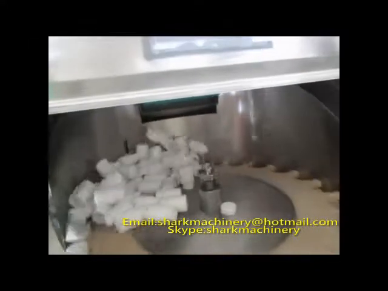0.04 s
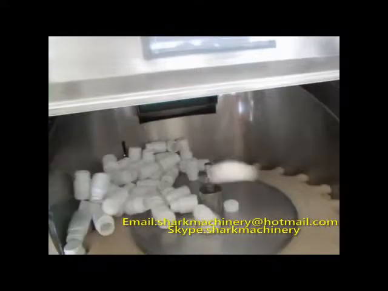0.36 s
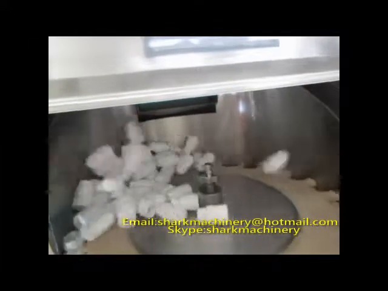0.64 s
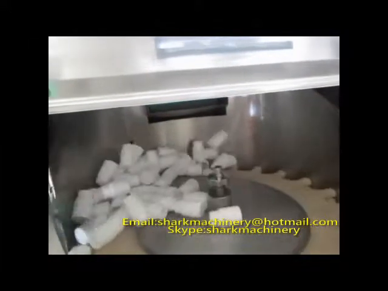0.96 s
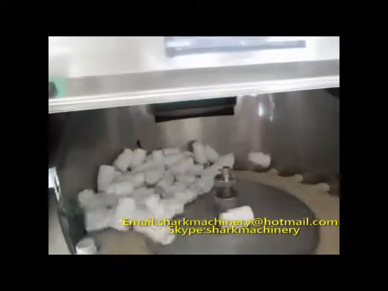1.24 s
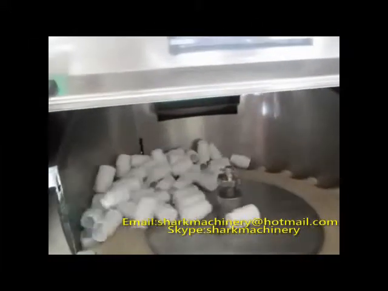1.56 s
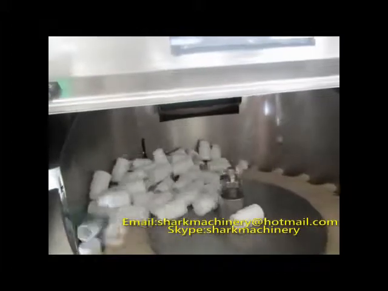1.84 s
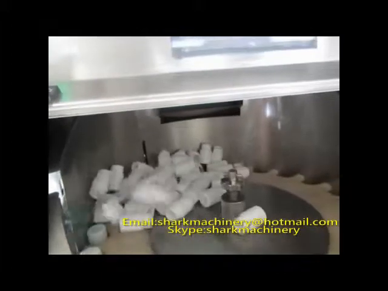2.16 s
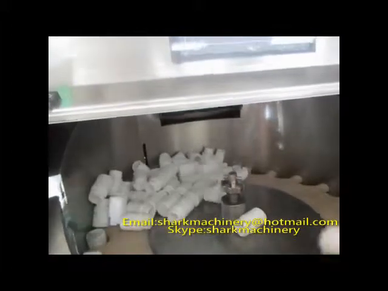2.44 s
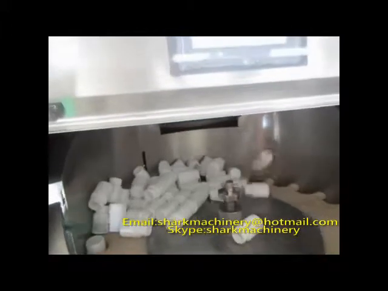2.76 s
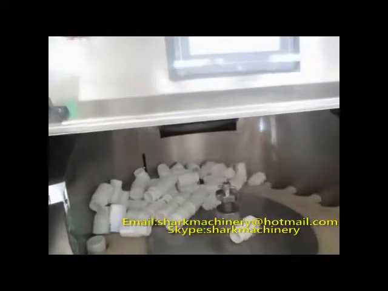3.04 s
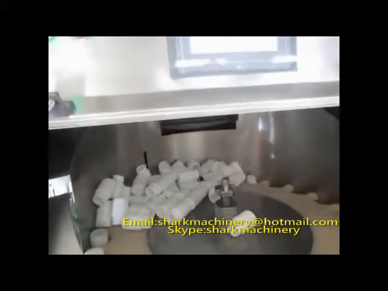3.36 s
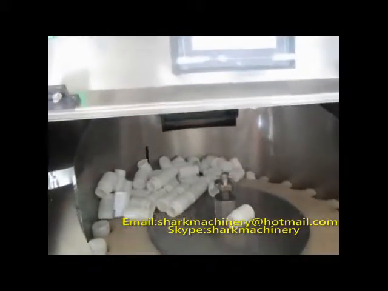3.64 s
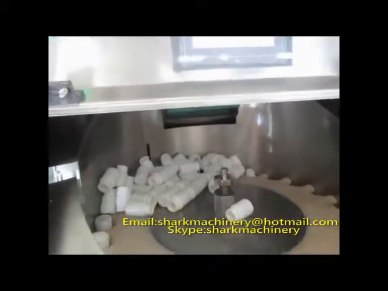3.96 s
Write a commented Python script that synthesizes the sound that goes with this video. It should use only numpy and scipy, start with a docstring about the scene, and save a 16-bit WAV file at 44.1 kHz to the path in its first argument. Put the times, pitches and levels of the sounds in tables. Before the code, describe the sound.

Empty plastic bottles tumble close by in a sorting machine's steel bowl, knocking hollowly and sliding over steady motor noise. Just past halfway a valve thumps and air hisses briefly. The bottles clatter on, then settle.

```python
"""Empty plastic bottles tumble in the turning steel bowl of a sorting machine, over steady motor noise.
From the start they knock hollowly, bump the bowl's disc and slide with a hiss.
At about 2.3 s a valve thumps and an air jet blows into the bowl for a quarter of a second.
The bottles clatter on and settle by 3.5 s. A soft thud and a little more hiss come near the end."""
import sys
import numpy as np
from scipy import signal
from scipy.fft import irfft
from scipy.io import wavfile
from scipy.ndimage import uniform_filter1d

SR = 44100
rng = np.random.default_rng(int(sys.argv[2]) if len(sys.argv) > 2 else 0)


def put_to_file(sound):
    """Save the sound as 16-bit audio at rate SR, in the file named by the first command-line argument."""
    columns = np.atleast_2d(sound).T  # one column per channel
    safe = np.clip(columns, -1, 1)
    whole_steps = np.round(safe * 32767)
    wavfile.write(sys.argv[1], SR, whole_steps.astype(np.int16))


N = 176400
TIME, HZ = np.arange(N) / SR, np.fft.rfftfreq(N, 1 / SR)
HIT_TIME, HIT_HZ = np.arange(6144) / SR, np.fft.rfftfreq(6144, 1 / SR)  # the same axes for one short hit


def bottles():
    """Clear knocks and bright rim pings stand out from the random jostling of the heap."""
    # clear knocks: start_s, level_db, pitch_hz, clack_db, tick_db (the last two relative to the level)
    knocks = [(0.204, -12, 894, -8, -30), (0.239, -11, 947, 0.5, -16.5), (0.261, -11, 886, -1.5, -21),
              (0.321, -11.5, 944, 3.5, -14.5), (0.334, -7, 900, -5.5, -26.5), (0.434, -6.5, 885, -9, -30),
              (0.462, -10.5, 945, -4.5, -18.5), (0.543, -11.5, 830, -6.5, -24),
              (0.578, -11.5, 910, -3, -19), (0.593, -7.5, 830, -3.5, -17.5), (0.606, -17.5, 865, 4, -10),
              (0.649, -6.5, 983, -23, -24), (0.683, -10.5, 1037, -31, -24), (0.728, -13.5, 878, -5, -20),
              (0.771, -12.5, 865, -22, -32), (0.846, -8, 1014, -11, -21), (0.866, -6, 852, -7, -20),
              (0.881, -15, 874, -9, -20), (0.903, -7, 883, -6, -23.5), (0.91, -7, 942, -20, -23),
              (0.928, -12, 912, -23, -42), (1.023, -14, 920, -18, -20.5), (1.061, -9.5, 874, -23, -22),
              (1.134, -17, 860, 2.5, -15), (1.16, -14.5, 879, -4, -17), (1.355, -10, 808, -9, -21.5),
              (1.42, -13, 972, -8, -21), (1.575, -15, 930, -2.5, -23), (1.862, -23, 940, -3, -16),
              (1.935, -18, 949, -10.5, -15.5), (1.965, -20.5, 896, 0, -15), (1.999, -14.5, 862, -2.5, -21),
              (2.187, -11.5, 894, -4.5, -16), (2.202, -10, 935, -9.5, -29), (2.272, -8.5, 855, -8, -22),
              (2.401, -10, 823, -11, -30), (2.436, -7.5, 936, -16.5, -16), (2.459, -10, 976, -27, -30),
              (2.52, -18, 906, -14, -18.5), (2.595, -26.5, 866, -2, -9), (2.667, -12, 911, -12.5, -23.5),
              (2.737, -12.5, 904, -11, -22), (2.812, -19.5, 847, -14, -21), (2.895, -7, 926, -8, -23),
              (2.908, -14, 956, -0.5, -19), (2.932, -9, 930, -1.5, -29), (2.938, -4.5, 960, -27, -36),
              (2.998, -18.5, 970, -1.5, -30), (3.093, -15.5, 984, -2, -17), (3.192, -30.5, 1000, 6.5, -6),
              (3.248, -22, 878, -2, -12.5), (3.343, -25.5, 912, 2.5, -15)]
    # rims striking steel: start_s, level_db, pitch_hz
    pings = [(.54, -31.5, 7300), (1.324, -33, 6850), (2.664, -40, 5900), (2.908, -35, 7500),
             (2.932, -32.5, 6650), (3.032, -29.5, 6700), (3.331, -40.5, 5600)]
    # how hard the heap is stirred: time_s, level_db
    churn = [(0, -24.5), (.14, -27.5), (.25, -25.5), (.68, -21.5), (.92, -22.5), (.98, -30.5),
             (1.13, -22.5), (1.22, -29), (1.66, -25), (1.9, -34), (2.2, -25), (2.48, -35), (2.6, -38.5),
             (2.83, -35.5), (2.93, -28.5), (3.1, -32), (3.35, -36), (3.5, -58)]
    jostles_per_s, usual_pitch_hz = 130, 890
    out = np.zeros((2, N))
    for start_s, level_db, pitch_hz, clack_db, tick_db in knocks:
        add(out, start_s, knock(level_db, pitch_hz, clack_db, tick_db))
        touch_s = start_s - .009 * rng.uniform(.55, 1)  # a light glancing touch comes just before
        add(out, touch_s, knock(level_db - 15, usual_pitch_hz, clack_db, tick_db))
    for start_s, level_db, pitch_hz in pings:
        add(out, start_s, amp(level_db) * rim_ping(pitch_hz))
    jostles = rng.uniform(-1, 1, (int(churn[-1][0] * jostles_per_s), 5))
    for slot, (shift, size, pitch, clack, tick) in enumerate(jostles):
        start_s = (slot + shift) / jostles_per_s
        level_db = curve(churn, start_s) + 4.5 + 4 * size
        pitch_hz = usual_pitch_hz * 2 ** (.22 * pitch)
        add(out, start_s, knock(level_db, pitch_hz, clack_db=-6.5 + 4 * clack, tick_db=-25 + 6 * tick))
    return out


def knock(level_db, pitch_hz, clack_db, tick_db):
    """One bottle is hit: the contact ticks, the stiff wall clacks and the hollow shell rings."""
    # tone colour of the clack: frequency_hz, level_db
    clack_colour = [(100, -71), (600, -7), (1000, 7), (1400, -0.5), (1850, -1.5), (2600, -3.5),
                    (3300, -14.5), (5000, -65)]
    # tone colour of the tick: frequency_hz, level_db
    tick_colour = [(1000, -33), (3000, -5), (4200, -4), (5600, 1), (7000, 6), (8200, -4), (10000, 1.5),
                   (12000, -7.5), (16000, -19)]
    ring = shell_ring(pitch_hz, clack_db)
    clack = amp(clack_db - .5) * burst(clack_colour, fade_s=.11)
    tick = amp(tick_db + 7.5) * burst(tick_colour, fade_s=.088)
    crack = clack + tick
    hit = ring + crack
    for delay, flip in rng.uniform(.2, 1, (2, 2)):  # two quick echoes off the nearest walls
        add(hit, delay * .009, amp(-5) * np.sign(flip - .6) * crack)
    left_right_db = 1.5 * rng.standard_normal() * np.array([[.5], [-.5]])
    return amp(level_db - 11.5 + left_right_db) * hit


def shell_ring(pitch_hz, clack_db):
    """The hollow shell vibrates at several pitches at once, each dying away quickly."""
    # the shell's vibrations: pitch_ratio, level_db, fade_s
    vibrations = [(1, 1, 0.095), (.87, -10, 0.055), (.52, -15, 0.073), (1.48, -18, 0.064),
                  (2.06, -6, 0.062), (2.85, -12, 0.033)]
    ring, rise_s = 0, .0011
    for ratio, level_db, fade_s in vibrations:
        detune, phase, lag, spot = np.clip(rng.standard_normal(4), -1, 1)
        if ratio > 1:  # a harder clack wakes more overtones
            level_db += 6 + .76 * clack_db
        if ratio != 1:
            level_db += 6 * spot  # the spot that is hit favours some vibrations
            ratio *= 1 + .0699 * detune
        cycles = pitch_hz * ratio * HIT_TIME + phase + .057 * lag * np.array([[1], [-1]])
        ring = ring + amp(level_db) * fade(fade_s) * np.sin(2 * np.pi * cycles)
    return level_hit(ring * (1 - np.exp(-HIT_TIME / rise_s)))


def rim_ping(pitch_hz, width_hz=1200):
    """A stiff rim rings briefly on steel in a tight cluster of high pitches."""
    cluster = noise(1 / (1 + (2 * (HIT_HZ - pitch_hz) / width_hz) ** 4), HIT_HZ)
    return level_hit(cluster * fade(.06))


def bumps_and_thuds():
    """Bottles bump dully on the disc; now and then a bottle, the machine or the valve thuds."""
    # strength of the bumping: time_s, level_db
    bumping = [(0, -38), (.7, -33), (1, -38.5), (1.68, -35.5), (1.9, -44), (2.25, -34.5), (2.62, -48),
               (2.95, -40), (3.45, -48)]
    # tone colour of a bump: frequency_hz, level_db
    bump_colour = [(30, -44), (90, -47), (155, 9.5), (205, -27), (280, 3), (370, -4), (490, 6), (680, 2.5),
                   (900, -14), (2000, -56)]
    # heavier thuds: start_s, level_db, pitch_hz
    thuds = [(0.674, -32.5, 161), (0.734, -27.5, 290), (1.054, -30.5, 487), (1.265, -27, 527),
             (1.652, -26, 700), (1.685, -26.5, 448), (2.281, -24.5, 318), (2.286, -23.5, 140),
             (2.483, -27, 259), (3.795, -40.5, 100)]
    bumps_per_s, thud_width_octaves = 70, .7
    out = np.zeros((2, N))
    for slot, (shift, size) in enumerate(rng.uniform(-1, 1, (int(bumping[-1][0] * bumps_per_s), 2))):
        start_s = (slot + shift) / bumps_per_s
        add(out, start_s, amp(curve(bumping, start_s) + 6.8 * size) * burst(bump_colour, fade_s=.15))
    thud_shape = np.minimum(HIT_TIME / .0026, 1) * fade(.085)
    muffle = 1 / (1 + (HIT_HZ / 900) ** 2)
    for start_s, level_db, pitch_hz in thuds:
        octaves_away = np.log2((HIT_HZ + 1) / pitch_hz)
        body = noise(muffle / (1 + (octaves_away / thud_width_octaves) ** 2), HIT_HZ)
        add(out, start_s, amp(level_db) * level_hit(body * thud_shape))
    return out


def air_jet():
    """Air rushes in while the valve is open; thin tones sing with it and stay faintly on all the time."""
    # the valve opens and shuts: time_s, level_db
    blast = [(2.262, -50), (2.285, 1.5), (2.32, 0), (2.358, 0.5), (2.41, -1), (2.44, 2), (2.484, -1.5),
             (2.503, -16.5), (2.6, -43)]
    # tone colour of the jet's hiss: frequency_hz, level_db
    hiss_colour = [(760, -21), (1300, -4.5), (3450, -3), (3880, -10.5), (4200, -2.5), (6350, 1.5),
                   (12500, -1), (15500, -4)]
    # tone colour of its low rush: frequency_hz, level_db
    rush_colour = [(40, -38), (140, -2), (450, -11), (1200, -6), (2600, -50)]
    # thin ringing tones: pitch_hz, level_db
    thin_tones = [(5838, -34), (6518, -45), (8507, -38)]
    flow = amp(curve(blast, TIME))
    hiss = noise(amp(read(hiss_colour, HZ)), HZ)
    hiss_in_bowl = amp(-19) * unit(hiss + amp(-3.5) * bowl_echoes(hiss))
    rush = amp(-35.5) * noise(amp(read(rush_colour, HZ)), HZ)
    singing = amp(-4) * sum(amp(db) * wavering_tone(hz, width_hz=48) for hz, db in thin_tones)
    return flow * (hiss_in_bowl + rush) + (flow + amp(-29)) * singing


def sliding():
    """Plastic rubs over steel with a fluttering hiss."""
    # strength of the rubbing: time_s, level_db
    rubbing = [(0, -41), (.92, -42), (.965, -45), (1.01, -58), (1.05, -38.5), (1.25, -43.5), (1.33, -36),
               (1.5, -42), (2.12, -49), (2.19, -36), (2.26, -47), (2.6, -54), (2.8, -51), (2.9, -42.5),
               (3.05, -34.5), (3.18, -46.5), (3.5, -52.5), (3.78, -55), (3.83, -46), (4, -50.5)]
    # tone colour of the hiss: frequency_hz, level_db
    colour = [(500, -23), (2000, 8.5), (3600, -2), (6300, 3), (9700, 4), (11500, 1), (13500, 6),
              (16000, -10.5)]
    flutter_db = 2.2 * unit(uniform_filter1d(rng.standard_normal(N), size=500))  # changes about every 10 ms
    return amp(curve(rubbing, TIME) + 5 + flutter_db) * noise(amp(read(colour, HZ)), HZ)


def bowl_echoes(sound):
    """Sound bounces around inside the steel bowl and blurs into a ringing tail."""
    # how long the bowl rings: frequency_hz, fade_s
    ring_times = [(650, .25), (970, .35), (1300, .23), (7000, .16), (15000, .5)]
    hz, t, bands = signal.stft(noise(1, np.fft.rfftfreq(SR // 2, 1 / SR)), SR, nperseg=256)
    shape = np.minimum(t / .0072, 1) * fade(read(ring_times, hz)[:, None], t)
    tail = signal.istft(bands * shape, SR)[1]
    return signal.fftconvolve(sound, tail / np.linalg.norm(tail[0]), axes=1)[:, :N]


def motor():
    """The motor and the hall make a steady noise with a low hum."""
    # tone colour of the noise: frequency_hz, level_db
    colour = [(25, -25), (90, -20.5), (140, -2), (200, -5), (300, 1), (480, -1.5), (750, -5), (2200, -16),
              (3700, -26), (7000, -22), (15500, -25)]
    whir = amp(-37) * noise(amp(read(colour, HZ)), HZ)
    return whir + amp(-51.5) * wavering_tone(160, width_hz=13.5)


def burst(colour, fade_s):
    """Many crowded vibrations, struck at once and dying together, sound like a puff of noise."""
    strike = 1 + np.exp(-HIT_TIME / .0021)
    return level_hit(noise(amp(read(colour, HIT_HZ)), HIT_HZ) * fade(fade_s) * strike)


def wavering_tone(pitch_hz, width_hz):
    """A band of noise so narrow that it sounds like an unsteady tone."""
    return noise(1 / (1 + (2 * (HZ - pitch_hz) / width_hz) ** 2), HZ)


def noise(gain, hz):
    """Stereo noise of strength 1, shaped by the given gain at each frequency."""
    # how alike left and right are: frequency_hz, likeness (0 to 1)
    likeness = [(40, .3), (130, .6), (280, .68), (550, .94), (1000, .8), (2000, .86), (4000, .45),
                (8000, .05)]
    left, other = rng.standard_normal((2, len(hz))) + 1j * rng.standard_normal((2, len(hz)))
    same = read(likeness, hz)
    right = same * left + np.sqrt(1 - same ** 2) * other
    return unit(irfft(gain * np.array([left, right])))


def fade(fade_s, t=HIT_TIME):
    """A gain that falls by 60 dB in fade_s seconds."""
    return amp(-60 * t / fade_s)


def level_hit(hit):
    """Scales a hit to an average strength (rms) of 1 over its first 15 ms."""
    return hit / np.sqrt(np.mean(hit[..., :660] ** 2) + 1e-20)


def unit(sound):
    """Scales a sound to an average strength (rms) of 1."""
    return sound / np.sqrt(np.mean(sound ** 2) + 1e-20)


def amp(db):
    """Turns decibels into a gain."""
    return 10 ** (np.asarray(db) / 20)


def read(points, hz):
    """Reads between the rows of a frequency table, with octaves evenly spaced."""
    row_hz, values = np.transpose(points)
    return np.interp(np.log(hz + 1), np.log(row_hz + 1), values)


def curve(points, t):
    """Reads between the rows of a time table."""
    return np.interp(t, *np.transpose(points))


def add(mix, start_s, sound):
    """Mixes a sound in at start_s."""
    part = mix[:, max(round(start_s * SR), 0):][:, :sound.shape[-1]]
    part += sound[..., :part.shape[1]]


def scene():
    """Clatter with its deep bass cut away, echoing in the bowl, with the hiss, the jet and the motor."""
    noises = motor() + air_jet() + sliding()
    bass_cut = signal.butter(3, 107, "high", fs=SR, output="sos")
    clatter = signal.sosfilt(bass_cut, bottles() + bumps_and_thuds())
    return noises + clatter + amp(-8) * bowl_echoes(clatter)


def record(dry):
    """Cuts off the very highest treble."""
    treble_cut = signal.firwin(511, 15700, window=("kaiser", 9), fs=SR)
    return signal.oaconvolve(dry, treble_cut[None], "same")


dry = scene()
out = record(dry)
put_to_file(out)
```